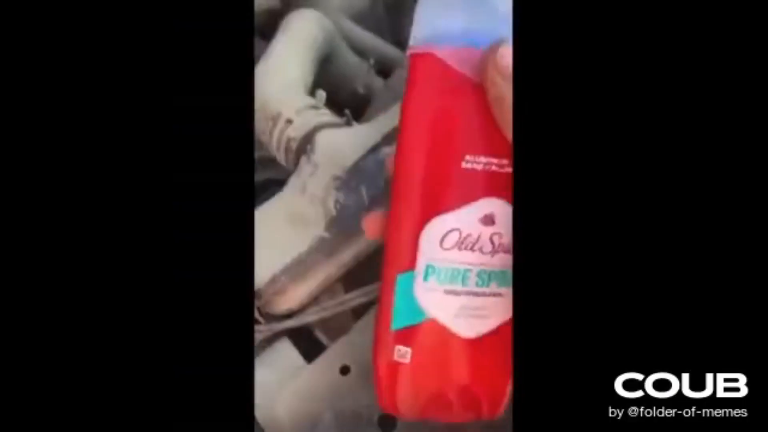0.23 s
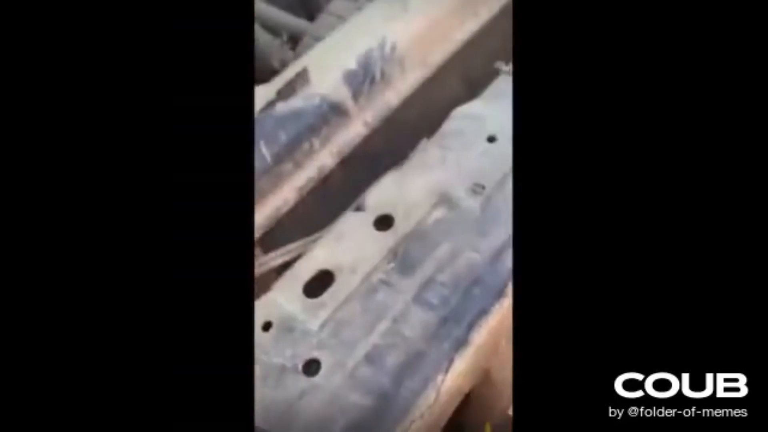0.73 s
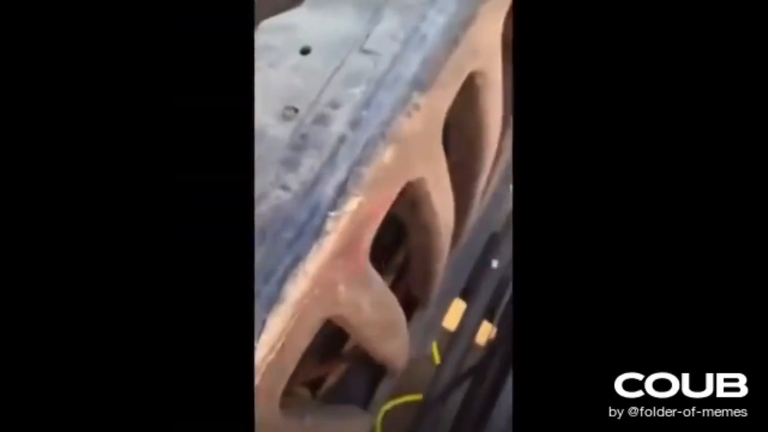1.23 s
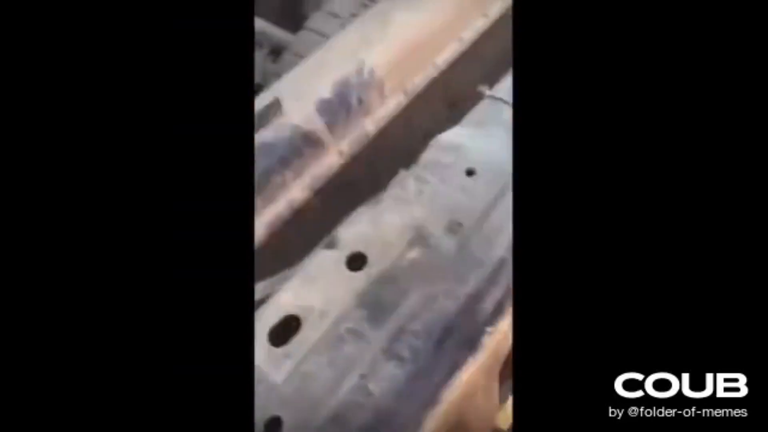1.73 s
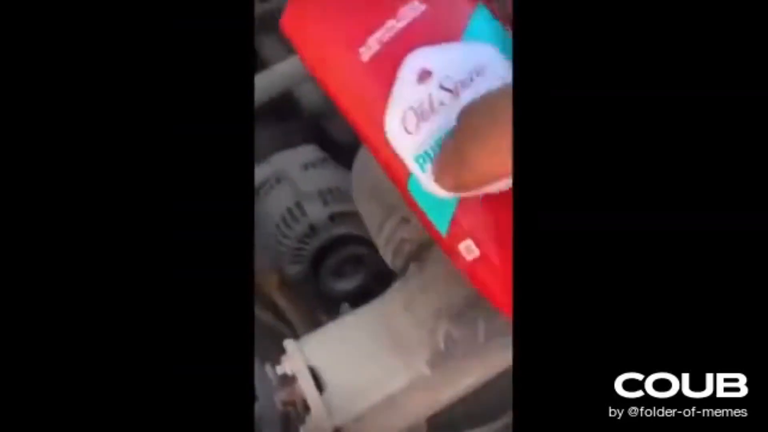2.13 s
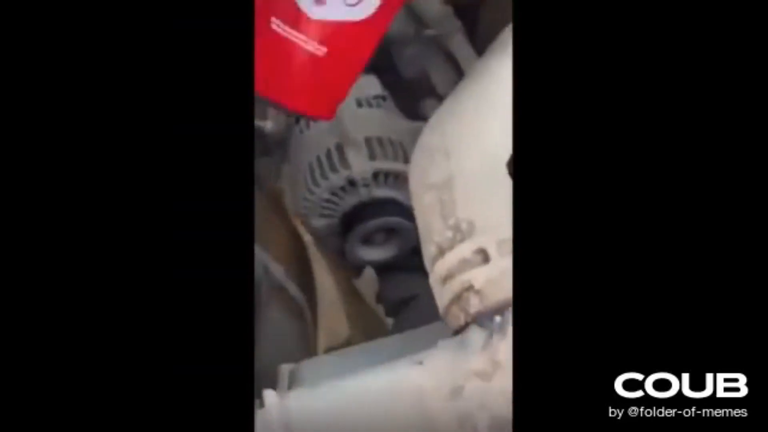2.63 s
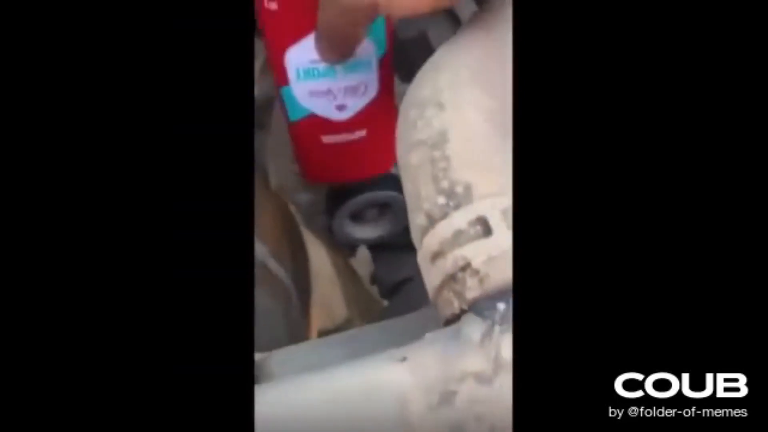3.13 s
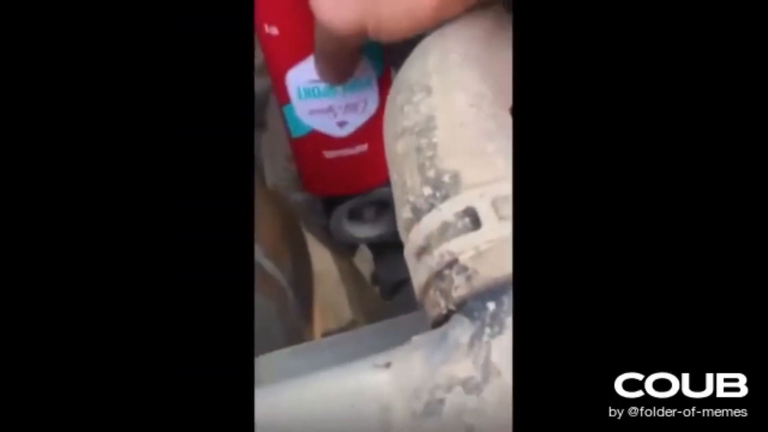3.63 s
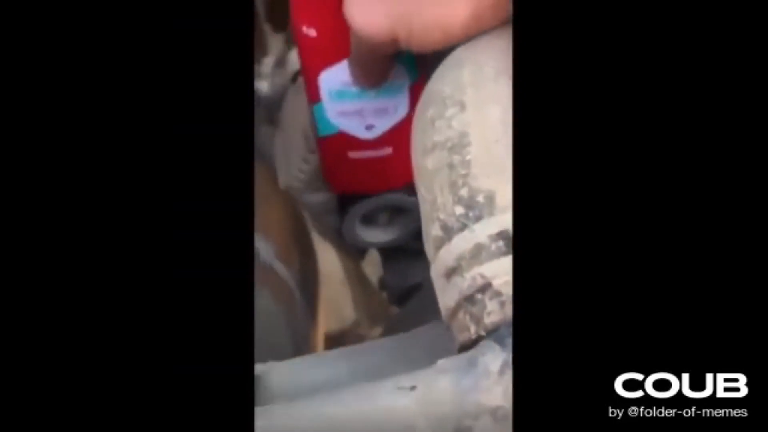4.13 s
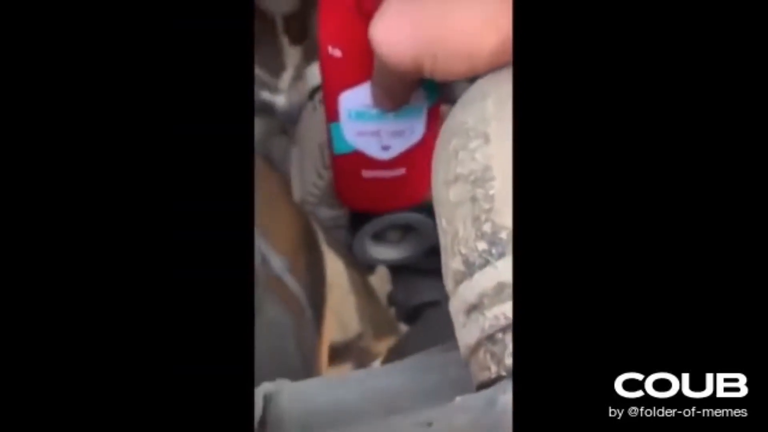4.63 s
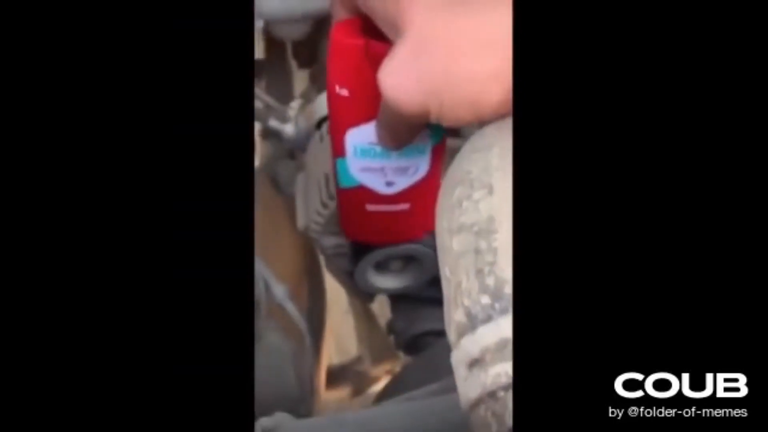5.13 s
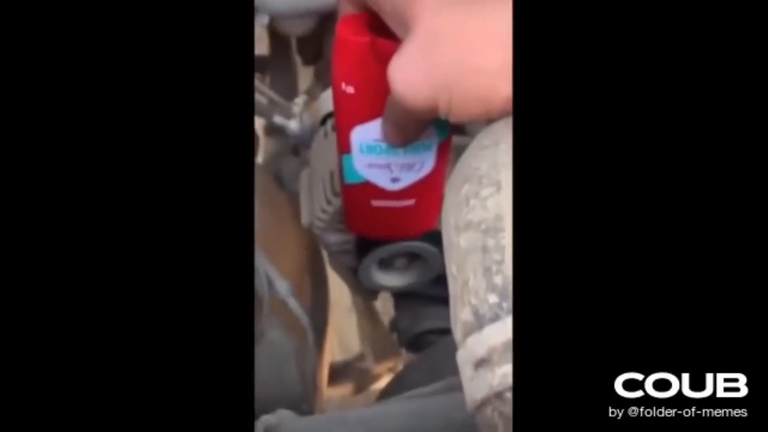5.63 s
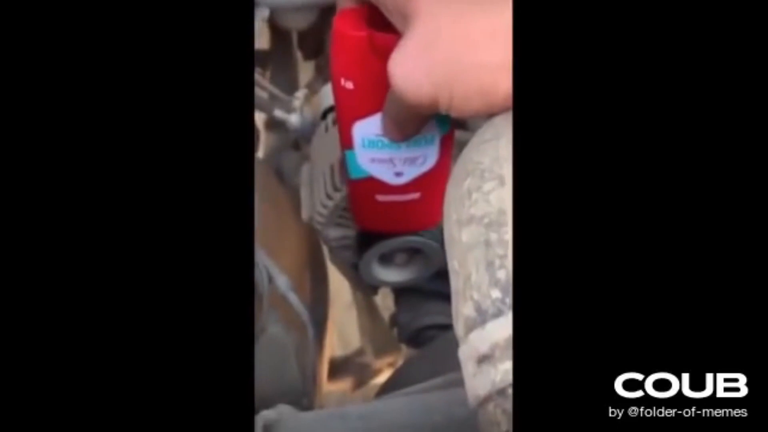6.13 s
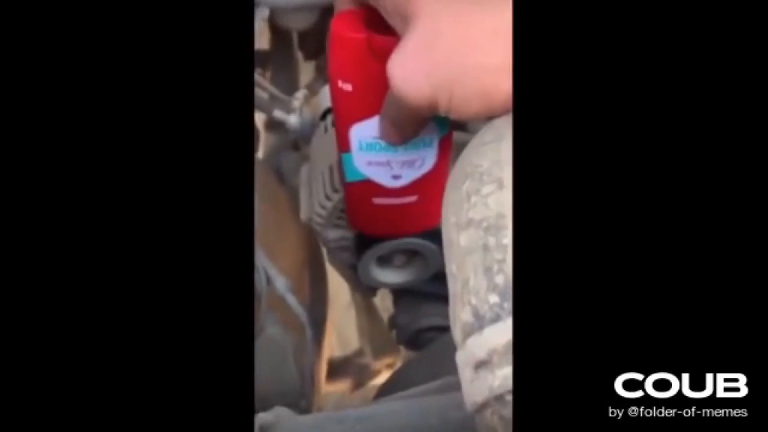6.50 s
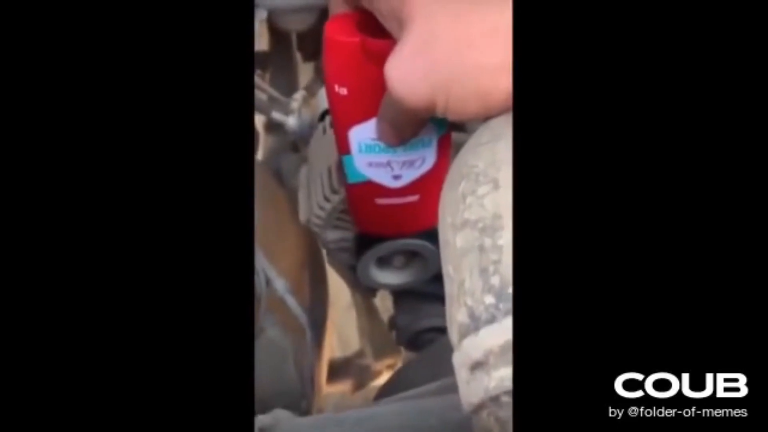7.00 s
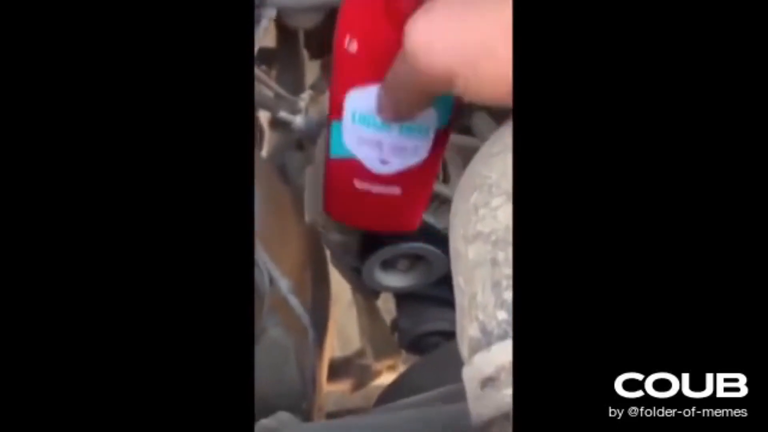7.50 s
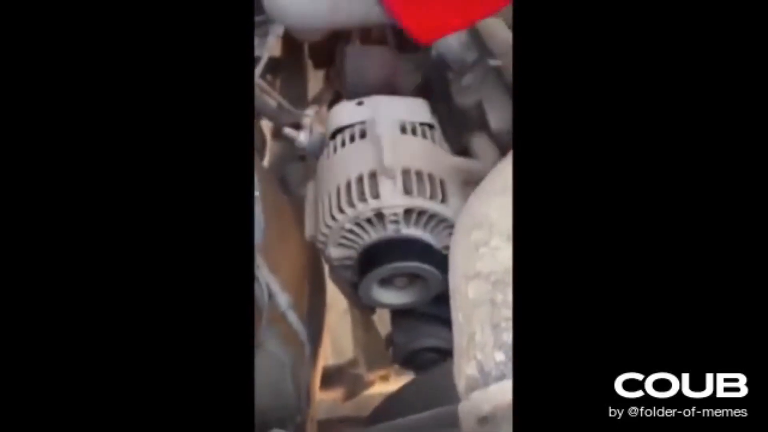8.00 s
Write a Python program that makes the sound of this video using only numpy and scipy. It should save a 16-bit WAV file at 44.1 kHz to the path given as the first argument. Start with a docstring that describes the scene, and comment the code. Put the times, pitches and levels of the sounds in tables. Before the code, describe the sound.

A dry drive belt chirps in a fast, harsh, high squeal over an idling car engine, then thins to sparse chirps and leaves only the idle.

```python
"""A blink of quiet outdoor rumble, a short silence, then an idling car engine close up under the open bonnet.
At first its dry drive belt slips once a turn of the pulley: two friction-driven modes chirp roughly
over a rasp of rubber, lurching in pitch and following the worn stretches of the belt.
A waxy stick held against the belt then shortens and thins out the chirps until only the idle is left:
notes at orders of the firing rate, with shaped noise for the block's rumble and the whirr of fan and pulleys."""
import sys
import numpy as np
from scipy import signal
from scipy.fft import rfft, irfft, next_fast_len
from scipy.io import wavfile
from scipy.ndimage import uniform_filter1d

SR = 44100
rng = np.random.default_rng(int(sys.argv[2]) if len(sys.argv) > 2 else 0)


def master(y):
    """Save y as 16-bit WAV."""
    cut = np.clip(np.atleast_2d(y).T, -1, 1)
    pcm = np.round(cut * 32767)  # scale
    wavfile.write(sys.argv[1], SR, pcm.astype(np.int16))


N = 364089
TIME = np.arange(N) / SR

# speed of the pulley, on which the dry belt slips once a turn: (time [s], rate [turns/s])
PULLEY_SPEED = [(.35, 15.15), (1.3, 15.24), (2.2, 15.34), (3.4, 15.3), (4.3, 15.04)]
# uneven wear along one lap of the belt: (place along the belt [0-1], lower mode change [dB],
# upper mode change [dB], lower mode pitch [Hz], upper mode pitch [Hz])
BELT_WEAR = [(0, -1.5, 3, 3130, 5520), (0.061, 1, 5, 3150, 5550), (.14, -2, -2, 3230, 5950),
             (.21, 3.5, 0.5, 3240, 6160), (0.322, 0.5, 3, 3120, 5900), (0.402, -2.5, 0, 3256, 5550),
             (0.461, -10, 6.5, 3420, 5490), (0.528, -4, -10, 3080, 5760), (0.599, -6.5, 6, 3170, 5440),
             (0.679, 2, 2, 3170, 5670), (0.769, -2, 0, 3330, 6290), (0.85, -2, -1, 3180, 5720),
             (0.929, -1, 5.5, 3050, 5440)]
# dry squeal before the wear is added: (time [s], lower mode level [dB], upper mode level [dB])
SQUEAL_LEVELS = [(.35, -19, -24), (1.6, -21, -27.5), (2.7, -18.5, -25.5), (4.1, -16.5, -29)]
# lurches, where the grip changes and the lower mode swoops off its note and back:
# (middle time [s], target level [dB], target pitch [Hz])
LURCHES = [(.43, -18, 3540), (.455, -25, 3020), (.515, -14, 2830), (.55, -19, 3560), (.598, -17, 3010),
           (0.672, -13, 3360), (.715, -18, 3360), (.78, -14, 3030), (.808, -20.5, 3660), (0.849, -19, 3000),
           (.92, -16.5, 2960), (0.967, -21, 3650), (.988, -14.5, 2880), (1.021, -15.5, 3620),
           (1.147, -18, 3600), (1.17, -16.5, 2980), (1.232, -20.5, 2920), (1.283, -20, 3800),
           (1.445, -19, 3500), (1.522, -15.5, 3590), (1.621, -28, 3540), (1.642, -16.5, 2930),
           (1.689, -20, 3560), (1.706, -17, 2880), (1.751, -17, 3540), (1.869, -14.5, 3460),
           (1.892, -25, 2990), (1.92, -20, 3400), (1.997, -24, 3780), (2.16, -16, 3630), (2.207, -26, 3520),
           (2.235, -16.5, 3400), (2.293, -21, 2930), (2.333, -22.5, 3540), (2.352, -16.5, 2910),
           (2.421, -18, 2930), (2.47, -19.5, 3470), (2.545, -19, 3030), (2.585, -18.5, 3370),
           (2.62, -18, 3530), (2.712, -21, 3600), (2.82, -19.5, 2990), (2.873, -21, 3600),
           (2.893, -19.5, 2900), (3.01, -21, 2990), (3.046, -23.5, 3530), (3.073, -15, 2990),
           (3.133, -19.5, 2980), (3.296, -16.5, 3340), (3.345, -17.5, 3650), (3.422, -21, 3680),
           (3.545, -20.5, 2980), (3.605, -18, 2850), (3.64, -20, 3540), (3.763, -19.5, 3470),
           (3.822, -24, 3500), (4.062, -17.5, 3560), (4.265, -16.5, 2965), (4.326, -24, 2850),
           (4.487, -22.5, 3420), (4.801, -27, 3520), (4.859, -16.5, 3570), (5.09, -30, 3540),
           (5.583, -21.5, 3600), (6.053, -34.5, 3680)]
# separate chirps of the waxed belt: (time [s], length [s], lower mode level [dB],
# upper mode level [dB], lower mode pitch [Hz], glide from end to end [Hz])
CHIRPS = [(4.109, 0.056, -17.5, -28.5, 3164, 169), (4.174, 0.053, -15.5, -27, 3136, 31),
          (4.241, 0.0568, -20, -24, 3133, 44), (4.304, .06, -20.5, -29.5, 3110, -130),
          (4.373, .056, -18.5, -32.5, 3190, -250), (4.434, 0.07, -23, -30, 3215, 227),
          (4.502, .053, -19, -30.5, 3165, 23), (4.584, .031, -19, -31.5, 3200, 202),
          (4.633, .055, -25, -34.5, 3130, -160), (4.715, .039, -17.5, -29, 3190, -200),
          (4.774, .033, -32, -26.5, 3200, 28), (4.834, 0.0559, -21, -33, 3214, 151.5),
          (4.917, .027, -15, -31.5, 3077, 46), (4.964, .054, -17.5, -36, 3094, 1),
          (5.047, .051, -24.5, -44, 2984, 151), (5.112, .042, -18, -30, 3120, -170),
          (5.168, .018, -21, -34, 3200, 0), (5.183, 0.059, -25.5, -36, 3206, 101),
          (5.24, .045, -30.5, -32, 3272, 100), (5.314, .03, -15, -30.5, 3230, 152),
          (5.381, .04, -22, -34, 3090, -48), (5.443, .041, -17.5, -32, 3140, -200),
          (5.513, 0.028, -26, -41, 3140, -500), (5.582, .02, -17, -43, 3176, -200),
          (5.645, .031, -18, -38, 3085, 49), (5.703, 0.036, -21, -47, 3130, -52),
          (5.926, .027, -23.5, -38, 3245, -300), (6.169, .031, -22.5, -39, 3200, -100),
          (6.518, .024, -32, -53, 3660, 60), (6.642, .036, -23.5, -46, 3270, -400),
          (6.767, .024, -23, -40, 3465, 200), (6.902, .03, -30.5, -50, 3090, -100)]
# steady rubbing of the belt, before its flutter: (time [s], level [dB])
RUB_LEVELS = [(0.35, -28.5), (2.0, -32), (2.7, -35), (4.0, -40.5), (5.8, -49), (8.26, -54)]
# colour of rubber rasping on steel: (frequency [Hz], relative density [dB per Hz])
RASP_SPECTRUM = [(700, -27.5), (1900, -10.5), (2700, -4), (3200, -0.5), (3600, -1.5), (4100, -9),
                 (4500, -7.5), (4900, -7), (5600, -7.5), (6700, -11), (8400, -19.5), (9500, -37.5),
                 (15000, -39.5)]
# resonances of pulley and bracket that pick up the squeal: (frequency [Hz], width [Hz], gain [dB])
BRACKET_RINGS = [(3183, 70, 0), (5560, 130, -12), (6367, 140, -4.5)]

# mean firing rate of one cylinder bank: (time [s], rate [firings/s])
FIRING_RATE = [(0.35, 18.3), (3.6, 18.3), (4.6, 18.05), (6.3, 18.05), (8.26, 17.7)]
# strong notes of the idle, which shift as the microphone moves:
# (time [s], 3rd order level [dB], 5th order level [dB], 7th order level [dB])
STRONG_ORDERS = [(0.35, -32, -43, -28.5), (1.7, -34, -43.5, -34), (3.6, -30.5, -37.5, -34.5),
                 (4.5, -35.5, -37.5, -36.5), (6.298, -31, -31.5, -34.5), (6.9, -29.5, -32.5, -29),
                 (7.6, -29, -26, -35), (8.26, -25.5, -36, -32)]
# weaker notes of the idle: (order of the firing rate, level [dB])
WEAK_ORDERS = [(4, -41), (9, -43.5), (10, -43.5)]
# noise of the idle as the microphone moves about the bay, before the trims in engine():
# (time [s], block rumble level [dB], whirr of fan and pulleys level [dB])
BAY_LEVELS = [(0.37, -24, -30.5), (1.6, -25.5, -30), (2.8, -26.5, -29.5), (3.6, -28, -34.5),
              (4.5, -30.5, -33.5), (5.7, -30, -30.5), (6.7, -27, -27.5), (8.26, -26.5, -26.5)]
# colour of the block's rumble: (frequency [Hz], relative density [dB per Hz])
BLOCK_SPECTRUM = [(18, -25), (40, 0), (65, -2.5), (110, -1.5), (380, -2), (435, -5.5), (560, -4),
                  (650, -9.5), (950, -14.5), (4000, -52)]
# colour of the whirr of fan and pulleys: (frequency [Hz], relative density [dB per Hz])
WHIRR_SPECTRUM = [(400, -6.5), (950, -5.5), (1430, 1.5), (1650, -1.5), (1930, 2), (2120, -1.5),
                  (2500, -1.5), (4300, -13.5), (6200, -16.5), (8300, -25.5), (9600, -39.5), (15000, -37.5)]
# thin whine of the alternator, before its fade: (frequency [Hz], level [dB])
WHINE_LINES = [(7752, -53), (8556, -64.5)]
# knocks and ticks in the engine bay: (time [s], starting level [dB], pitch [Hz], width [Hz], t60 [s])
KNOCKS = [(1.583, -14, 2450, 1900, .06), (1.596, -21, 1500, 900, .1), (1.710, -16, 2200, 600, .055),
          (5.589, -30, 7400, 1600, .05)]

# colour of the outdoor rumble: (frequency [Hz], relative density [dB per Hz])
OUTDOOR_SPECTRUM = [(20, -11), (130, 0.5), (330, -21), (1100, -22), (9000, -46.5)]
# notch and dull top of the microphone: (frequency [Hz], gain [dB])
MICROPHONE_RESPONSE = [(6480, -1), (6600, -8.5), (6850, -2.5), (8600, -4.5), (9600, -7.5)]

OUTDOORS_END_S, ENGINE_START_S = 0.0646, 0.354
# the first slip is also the start of a lap of the belt; SQUEAL_END_S ends the once-a-turn slips
FIRST_SLIP_S, TURNS_PER_LAP, SQUEAL_END_S = 0.388, 3.628, 4.09
# length of a dry slip as a share of a turn, and how early it starts
SLIP_SHARE, LEAD_S = 1.096, 0.0205
# time a slip takes to break loose on the dry and on the waxed belt
DRY_ATTACK_S, WAXED_ATTACK_S = 0.00895, 0.0082
CEILING_DB = -17  # on the lower mode of a dry slip, before any lurch
USUAL_HZ, UPPER_RATIO = 3200, 1.83  # the lower mode's usual note; upper over lower mode when waxed
LURCH_S, LURCH_GRIP = 0.032, 0.92  # length, and share of the way to the target
BAY_T60_S = 0.07
EDGE_HZ = 15600  # upper band limit


def amp(db):
    """Level law: decibels to amplitude ratio."""
    return 10 ** (np.asarray(db) / 20)


def unit(x):
    """Normalisation: scales a signal to rms 1."""
    return x / np.sqrt(np.mean(x ** 2) + 1e-20)


def curves(rows):
    """Linear interpolation: each column of a table becomes a curve in time."""
    times, *columns = np.transpose(rows)
    return [np.interp(TIME, times, column) for column in columns]


def read(points, hz):
    """Spectral interpolation: decibels joined by straight lines over log frequency."""
    f, value = np.transpose(points)
    return np.interp(np.log(hz + 1), np.log(f), value)


def noise(spectrum):
    """Spectral shaping: white noise filtered to a given colour, rms 1."""
    size = next_fast_len(N, real=True)
    gain = amp(read(spectrum, np.fft.rfftfreq(size, 1 / SR)))
    white = rng.standard_normal(size)
    return unit(irfft(rfft(white) * gain, size)[:N])


def wander(rate_hz, size=N):
    """Low-passed chance: a smooth random curve up to about the given rate, near rms 1."""
    full = next_fast_len(size, real=True)
    lowpass = 1 / (1 + (np.fft.rfftfreq(full, 1 / SR) / rate_hz) ** 4)
    white = rng.standard_normal(full)
    return unit(irfft(rfft(white) * lowpass, full))[:size]


def angle(hz):
    """Phase accumulation: the integral of frequency gives an oscillator's phase."""
    return 2 * np.pi * np.cumsum(hz) / SR


def add(mix, s, sound):
    """Superposition: mixes a sound in at a time in seconds."""
    part = mix[max(round(s * SR), 0):][:len(sound)]
    part += sound[:len(part)]


def patchy(x, depth_db):
    """Random patchiness: smooth chance peaks and hollows vary a noise over time and frequency."""
    spectrogram = signal.stft(x, nperseg=512)[2]
    field = rng.standard_normal(spectrogram.shape)
    for _ in range(2):
        field = uniform_filter1d(field, 3, axis=0)  # across frequency
        field = uniform_filter1d(field, 22, axis=1)  # along time
    shaped = spectrogram * amp(depth_db * unit(field))
    return unit(signal.istft(shaped, nperseg=512)[1][:N])


def squeal(release=0.79, upper_release=0.88, rasp_db=-4.0, grain_db=2.0, octave_db=-19):
    """Stick-slip excitation: each slip sets two modes ringing, over the rasp of rubber on steel."""
    level, pull, upper, rasp = np.zeros((4, N))
    for start, attack_s, db, high_db, hz, high_hz in [*slips(), *chirps()]:
        t = np.arange(len(hz)) / SR
        progress = t / t[-1]
        # the slip breaks loose within milliseconds, then runs out
        attack = np.minimum(t / attack_s, 1)
        run_out = np.cos(progress * np.pi / 2).clip(0)
        drive = attack * run_out ** release * amp(db)
        add(level, start, drive)
        add(pull, start, drive * (hz - USUAL_HZ))

        upper_envelope = attack * run_out ** upper_release
        high = mode(high_hz, rough=0.019, scratch=1.6, lumps_db=3.5)
        add(upper, start, upper_envelope * amp(high_db) * high)
        # the rubber scrapes hardest as it breaks loose
        scrape_gain = (1 - progress / 2) * amp((db + high_db) / 2 + rasp_db)
        add(rasp, start, upper_envelope * scrape_gain)

    # the lower mode is one unbroken note that every slip and lurch bends
    level, hz = lurching(level, USUAL_HZ + pull / (level + 1e-9))
    low = mode(hz, rough=0.017, scratch=2.05, lumps_db=3)
    # stick and slip are lopsided, which adds an octave
    octave = unit(np.gradient(low ** 2))
    lower = level * (low + amp(octave_db) * octave)

    steady = amp(curves(RUB_LEVELS)[0] + 2 * wander(30))
    grain = amp(grain_db * wander(160))
    scrape = (rasp + steady) * grain * patchy(noise(RASP_SPECTRUM), depth_db=3.4)
    return lower + upper + scrape


def slips(scatter_s=0.0011, sag=0.021, lift=0.0093, rise=0.018, stray_glide=0.0269):
    """Periodic stick-slip: one slip a pulley turn, coloured by the stretch of belt that passes."""
    turns = np.cumsum(curves(PULLEY_SPEED)[0]) / SR
    turns -= np.interp(FIRST_SLIP_S, TIME, turns)
    place, *wear = np.transpose(BELT_WEAR)
    laps = turns / TURNS_PER_LAP
    wear_db, wear_high_db, hz, high_hz = (np.interp(laps, place, column, period=1) for column in wear)
    db, high_db = curves(SQUEAL_LEVELS)
    db = np.minimum(db + wear_db, CEILING_DB)
    high_db = high_db + wear_high_db

    times = np.interp(np.arange(int(turns[-1])), turns, TIME)
    for s, turn_s in zip(times[times < SQUEAL_END_S], np.diff(times)):
        late, low_bend, high_bend = rng.standard_normal(3)  # each slip bends its own way
        start = s + scatter_s * late - LEAD_S
        span = slice(round(start * SR), round((start + SLIP_SHARE * turn_s) * SR))
        u = np.linspace(-1, 1, span.stop - span.start)
        low_glide = (lift + stray_glide * low_bend / 2) * u
        low_pitch = hz[span] * (1 - sag * (1 - 2 * u ** 2) + low_glide)
        high_pitch = high_hz[span] * (1 + (rise + stray_glide * high_bend) * u)
        yield start, DRY_ATTACK_S, db[span], high_db[span], low_pitch, high_pitch


def chirps(sag_hz=65, stray=0.0262):
    """Intermittent slip of the waxed belt: short glides, sagging midway, that bend both modes together."""
    for s, length, db, high_db, hz, glide_hz in CHIRPS:
        u = np.linspace(-1, 1, round(length * SR))
        pitch = hz + glide_hz * u / 2 + sag_hz * (3 * u ** 2 - 0.5)
        high_pitch = pitch * UPPER_RATIO * (1 + stray * rng.standard_normal())
        yield s, WAXED_ATTACK_S, db, high_db, pitch, high_pitch


def lurching(level, hz):
    """Changing grip: each lurch pulls strength and pitch most of the way to its own, then lets go."""
    swell = LURCH_GRIP * np.hanning(round(LURCH_S * SR)) ** 0.5
    away, to_level, to_hz = np.zeros((3, N))
    for s, db, peak_hz in LURCHES:
        start = s - LURCH_S / 2
        add(away, start, swell)
        add(to_level, start, amp(db) * swell)
        add(to_hz, start, peak_hz * swell)
    stay = np.maximum(1 - away, 0)
    overlap = np.maximum(away, 1)  # averages lurches that overlap
    return stay * level + to_level / overlap, stay * hz + to_hz / overlap


def mode(hz, rough, scratch, lumps_db):
    """Friction-driven mode: uneven grip makes pitch hold and jump, shakes it, and lumps its strength."""
    size = max(len(hz), SR // 10)
    jumps, shake, grip, lumps = (wander(rate, size=size)[:len(hz)] for rate in (55, 380, 220, 70))
    pitch = hz * (1 + rough * (np.tanh(2 * jumps) + scratch * shake))
    flutter = 1 + 0.55 * np.tanh(grip)
    return unit(np.sin(angle(pitch)) * flutter * amp(lumps_db * np.tanh(lumps)))


def bay(x, wet_db=-8):
    """Reflection and resonance: direct sound, dense quick echoes off metal, ring of pulley and bracket."""
    t = np.arange(SR // 8) / SR
    decay = amp(-60 * t / BAY_T60_S)
    tail = rng.standard_normal(len(t)) * decay * (t > 0.0015)
    echoes = signal.oaconvolve(x, tail / np.linalg.norm(tail))[:N]
    ring = np.zeros(N)
    for hz, width_hz, db in BRACKET_RINGS:
        b, a = signal.iirpeak(hz, hz / width_hz, fs=SR)
        ring += amp(db) * signal.lfilter(b, a, x)
    return x + amp(wet_db) * echoes + ring


def engine(rumble_db=2.0, whirr_db=-0.73, throb=0.091, clatter=0.019, flap_hz=45.3, flap_db=-39):
    """Harmonic orders: firing gives low notes and throbs the rumble; the valve gear beats in the whirr."""
    cycle = angle(curves(FIRING_RATE)[0] * (1 + 0.0031 * wander(5.9)))
    drone = np.zeros(N)
    for order, db in [*zip((3, 5, 7), curves(STRONG_ORDERS)), *WEAK_ORDERS]:
        start_phase = 2 * np.pi * rng.random()
        drone += amp(db + wander(12)) * np.sin(round(order) * cycle + start_phase)
    # the slack belt flaps, beating against the lowest note
    flap = amp(flap_db + wander(2)) * np.sin(2 * np.pi * flap_hz * TIME)

    block_db, fan_db = curves(BAY_LEVELS)
    firing = 1 + throb * (np.cos(2 * cycle) + np.cos(5 * cycle))
    valves = 1 + clatter * (np.cos(5 * cycle / 2) + np.cos(5 * cycle))
    rumble = amp(block_db + rumble_db) * unit(firing) * noise(BLOCK_SPECTRUM)
    fan_noise = patchy(noise(WHIRR_SPECTRUM), depth_db=0.74)
    whirr = amp(fan_db + whirr_db + wander(68)) * unit(valves) * fan_noise
    # a sine's rms is its peak over root two, so this makes the note levels rms
    return np.sqrt(2) * (drone + flap) + rumble + whirr


def knocks():
    """Impulsive excitation: noise coloured by one broad resonance, dying exponentially as a short clack."""
    out, t = np.zeros(N), np.arange(4096) / SR
    f = np.fft.rfftfreq(len(t), 1 / SR)
    for s, db, hz, width_hz, t60 in KNOCKS:
        resonance = 1 / (1 + ((f - hz) / width_hz) ** 2 / 2) ** 2
        ring = unit(irfft(rfft(rng.standard_normal(len(t))) * resonance))
        attack = np.minimum(t / 0.00081, 1)
        add(out, s, attack * ring * amp(db - 60 * t / t60))
    return out


def alternator():
    """Narrow-band whine: thin wavering lines that fade as the belt regains its grip."""
    fade = np.interp(TIME, [3.7, 5.0], [1, 0.15])
    lines = np.zeros(N)
    for hz, db in WHINE_LINES:
        lines += amp(db + 3 * wander(2)) * np.sin(angle(hz + 3 * wander(20)))
    return fade * lines


def outdoors(level_db=-29):
    """Broadband background: steady noise coloured as a quiet outdoor rumble."""
    return amp(level_db) * noise(OUTDOOR_SPECTRUM)


def scene():
    """Superposition in time: outdoor rumble, silence, then the engine bay, alike in both channels."""
    car = bay(squeal() + knocks()) + engine() + alternator()
    car_on = np.clip((TIME - ENGINE_START_S) / 0.002, 0, 1)
    outdoors_on = np.clip((OUTDOORS_END_S - TIME) / 0.003, 0, 1)
    mono = car_on * car + outdoors_on * outdoors()
    return np.array([mono, mono])


def record(dry):
    """Linear filtering: the microphone's colour, then the band limit."""
    hz = np.linspace(0, SR / 2, 513)
    colour = signal.firwin2(511, hz, amp(read(MICROPHONE_RESPONSE, hz)), fs=SR)
    edge = signal.firwin(511, EDGE_HZ, window=("kaiser", 9), fs=SR)
    return signal.oaconvolve(dry, np.convolve(colour, edge)[None], "same", axes=1)


dry = scene()
out = record(dry)
master(out)
```